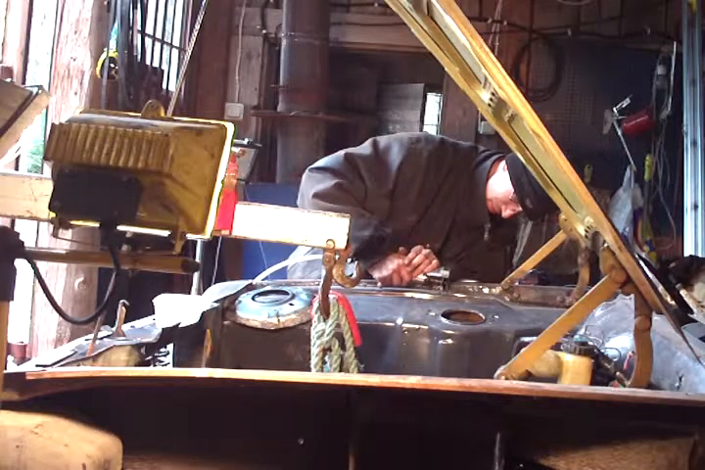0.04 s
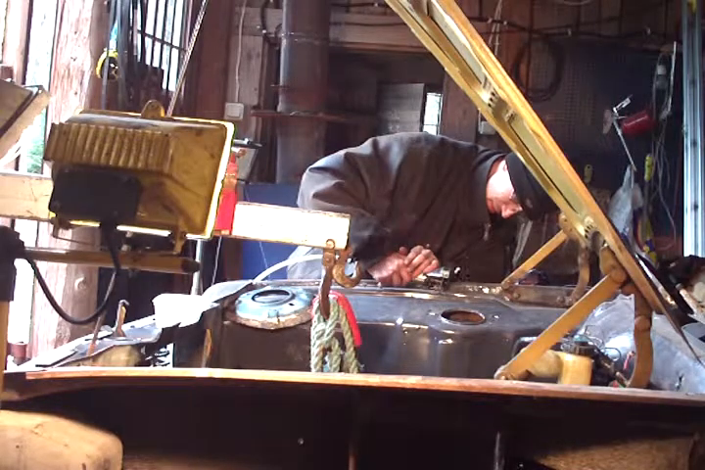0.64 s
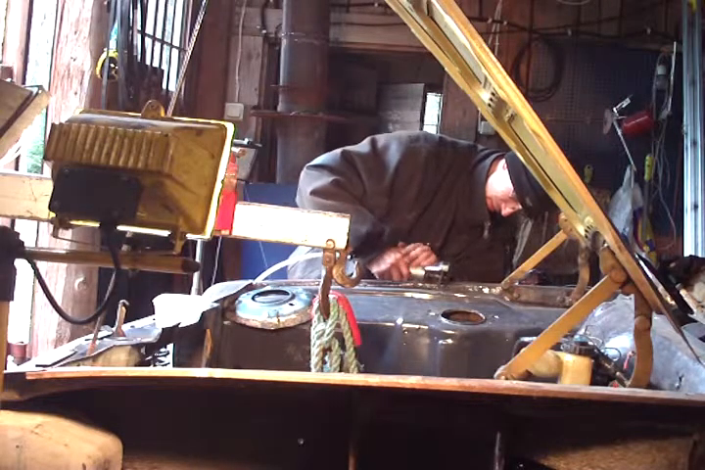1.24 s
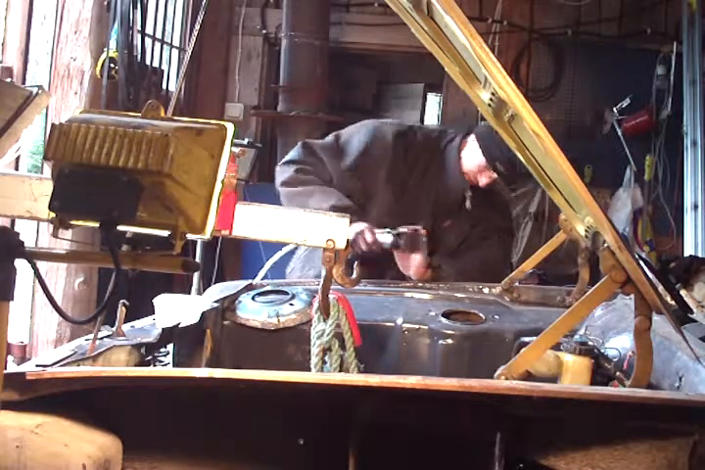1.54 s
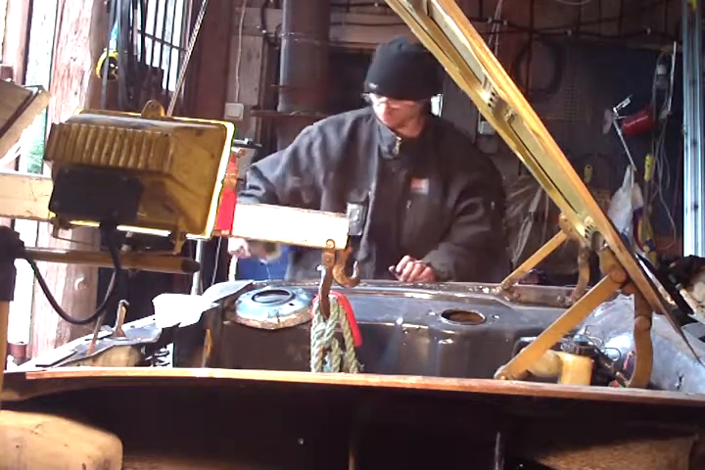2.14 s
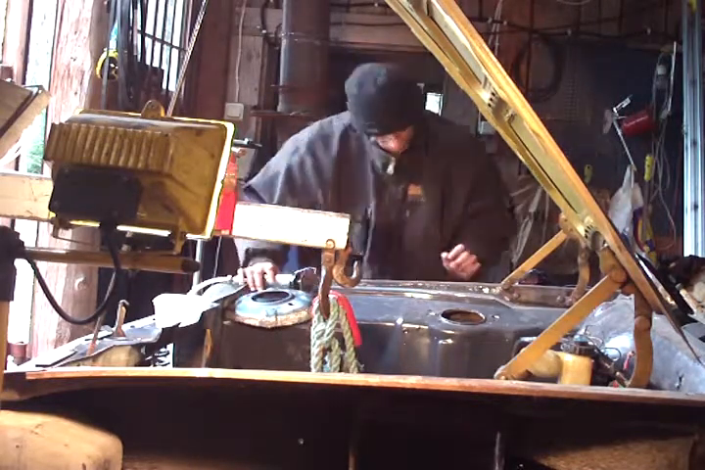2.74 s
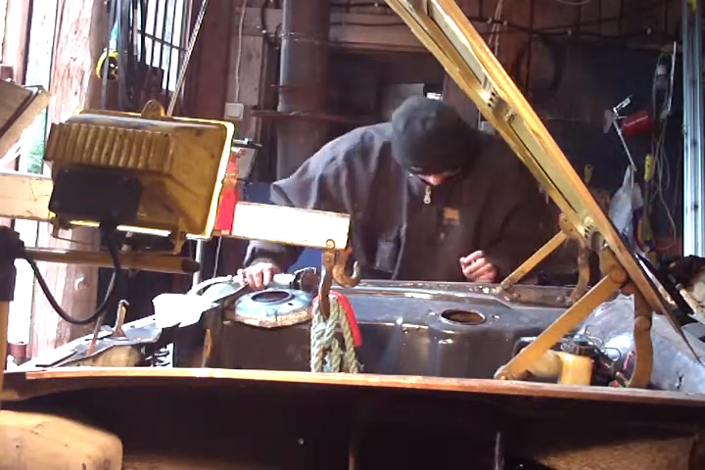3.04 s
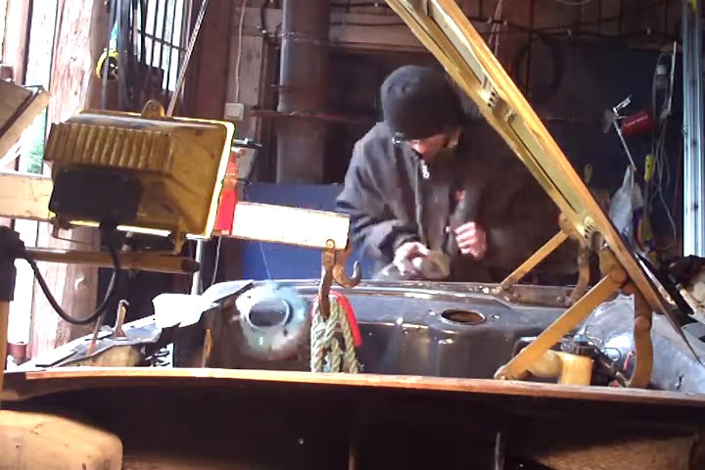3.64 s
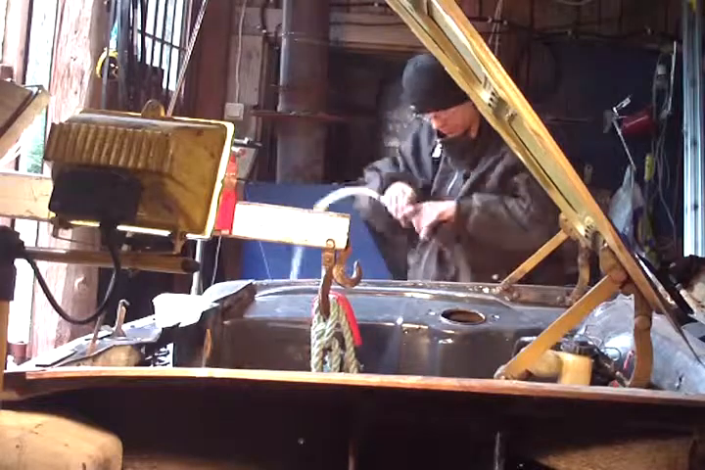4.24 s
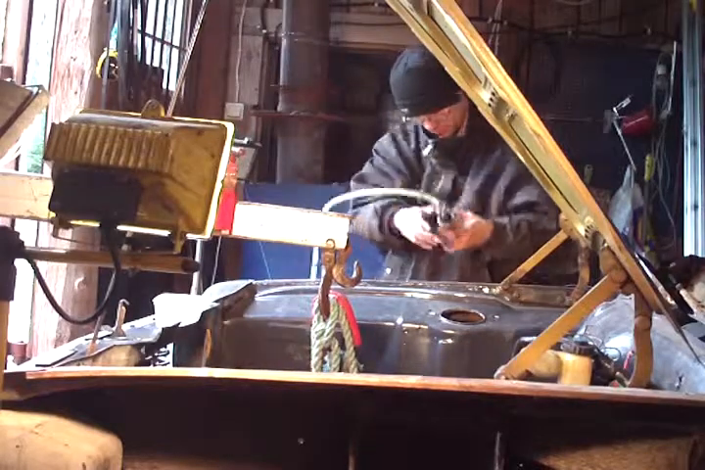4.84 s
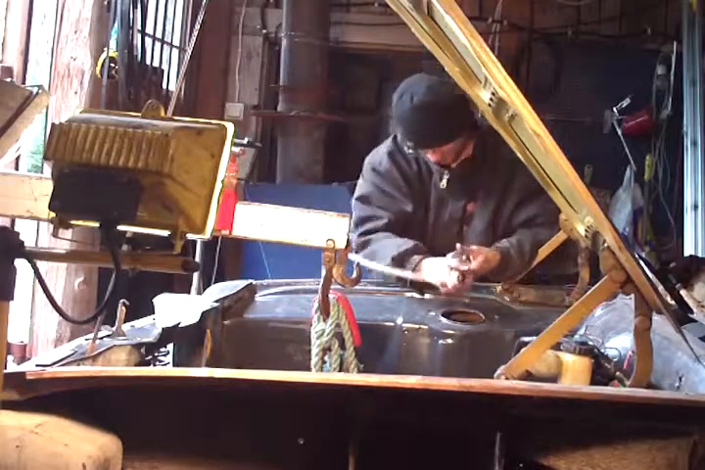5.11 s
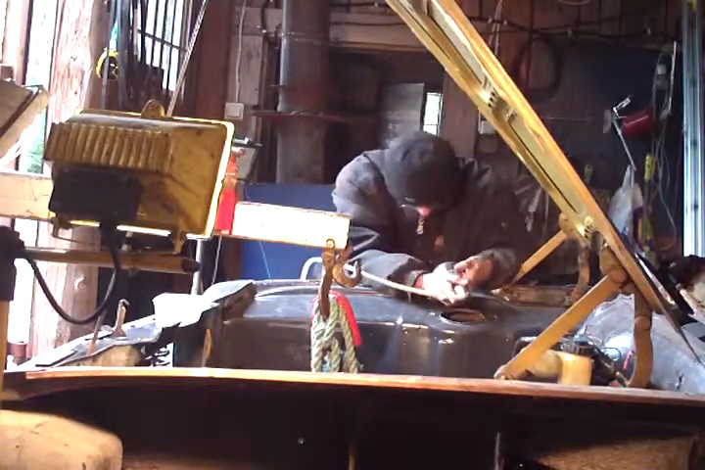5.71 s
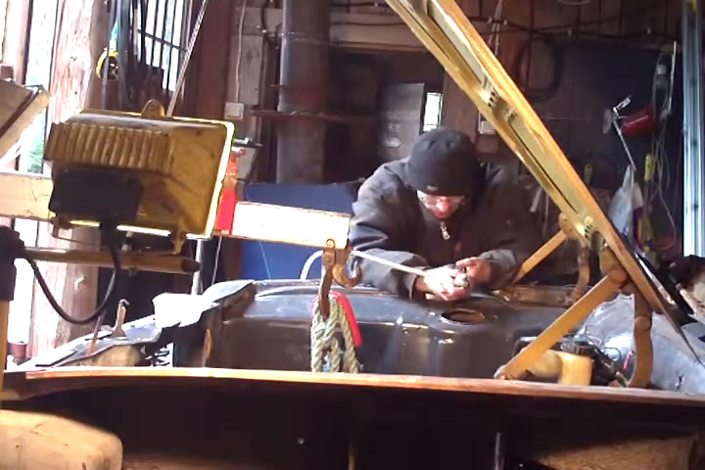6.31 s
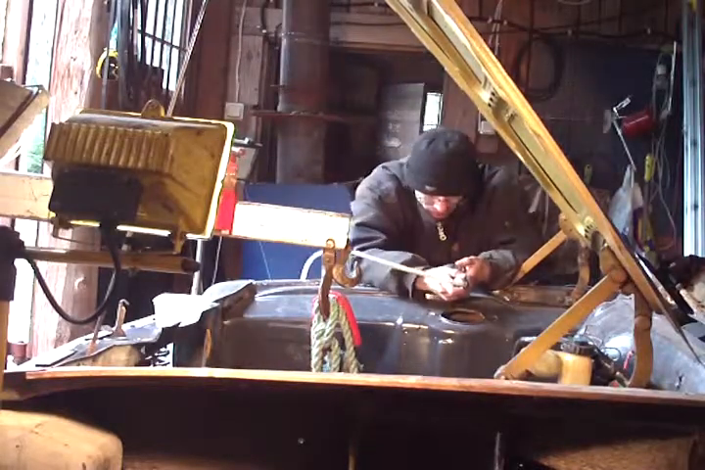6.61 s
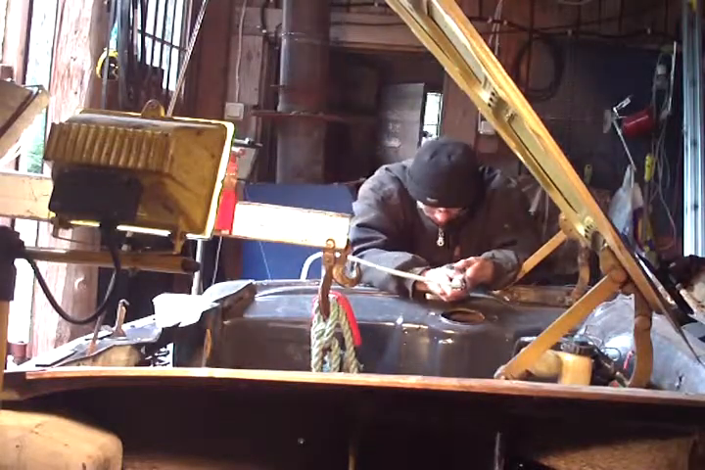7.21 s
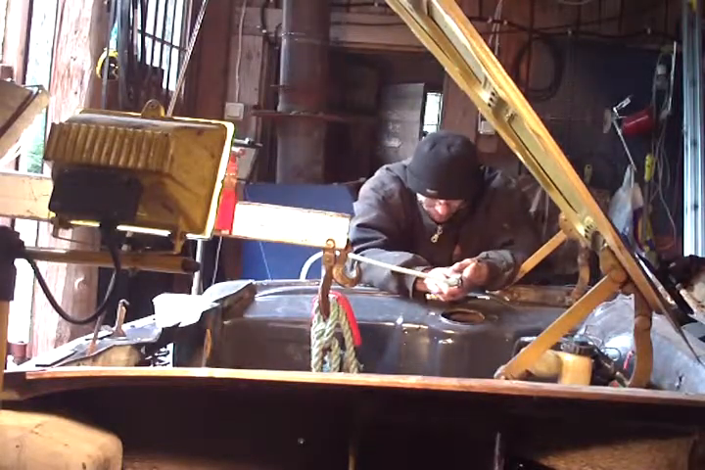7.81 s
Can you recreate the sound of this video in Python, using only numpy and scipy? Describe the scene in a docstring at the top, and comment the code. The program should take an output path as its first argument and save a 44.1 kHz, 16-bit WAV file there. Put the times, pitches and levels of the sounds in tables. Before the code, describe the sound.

An air grinder is already cutting a sheet-steel tank, with a whining tone, a rasp and hissing air. Its pitch sags and it chatters around 0.5 seconds and again near 1.1, then it whoops up briefly at 1.3 and winds down, leaving a low room rumble. From 2.5 to 2.7 seconds it is set down with a few metal knocks, and dull thuds follow near 3.4. At about 3.8 a loose steel lid slides with a faint hiss and falls, clattering loudest at 4.2. Ringing clanks, booms and small high clinks continue until 5.5, with softer thuds up to 6.3. After a lull, the grinder spins up at 7.4 with a rising whine and hiss, touching the steel near 7.9 with a rasp and thin squeal. The hard workshop echoes, and the loudest blows slightly overload a dull microphone.

```python
"""Air grinder and a falling steel lid

An air grinder bites into a sheet-steel tank, bogs down, chatters and is let go. Its air-driven vanes
sing, its burr (the cutting tip) rasps and its exhaust hisses. It is set down; a loose steel lid
slides off the tank, falls and clatters, and more knocks follow. Then the grinder spins up again.
The hard workshop echoes, and the loudest blows overload a dull microphone."""
import sys
import numpy as np
from scipy import signal
from scipy.fft import rfft, irfft, next_fast_len
from scipy.io import wavfile
from scipy.ndimage import uniform_filter1d, map_coordinates

SR = 44100
rng = np.random.default_rng(int(sys.argv[2]) if len(sys.argv) > 2 else 0)


def output_pcm(signal):
    """Save a mono or channel-first signal as 16-bit PCM at the path in sys.argv[1].

    Samples are clipped to [-1, 1] before scaling.
    """
    pcm = np.clip(np.atleast_2d(signal).T, -1, 1) * 32767
    wavfile.write(sys.argv[1], SR, np.round(pcm).astype(np.int16))


N = 355446
TIME_S = np.arange(N) / SR
START_S = 7.357  # the air valve opens for the second run
TOUCH_S, PRESS_S = 7.85, 0.14  # the burr is eased back on to the steel
STALL_HZ, REST_HZ = 91.89, 25  # shaft speeds: chatter grows below the first, silence at the second


def amp(db):
    """Turn decibels into a gain."""
    return 10 ** (np.asarray(db) / 20)


def unit(x):
    """Scale x to an average power of 1."""
    return x / np.sqrt(np.mean(x ** 2) + 1e-20)


def along(points, hz):
    """Read between (pitch_hz, value) points on a log pitch axis."""
    pitches, values = np.transpose(points)
    return np.interp(np.log(hz + 1), np.log(pitches + 1), values)


def ramp(start_s, length_s):
    """Rise from 0 to 1, then stay there."""
    return np.clip((TIME_S - start_s) / length_s, 0, 1)


def bump(peak_s, width_s):
    """Rise smoothly to 1 and fall back."""
    return np.exp(-((TIME_S - peak_s) / width_s) ** 2)


def wobble(rate):
    """A smooth curve through `rate` random values a second."""
    return map_coordinates(rng.standard_normal(int(N * rate / SR) + 4), [TIME_S * rate])


def filtered(x, response):
    """Multiply each frequency of x by response(hz)."""
    size = next_fast_len(len(x) + 8192)
    return irfft(rfft(x, size) * response(np.fft.rfftfreq(size, 1 / SR)), size)[:len(x)]


def coloured(x, spectrum):
    """Shape x with (pitch_hz, level_db) points, at a power of 1."""
    return unit(filtered(x, lambda hz: amp(along(spectrum, hz))))


def band(x, low_hz, high_hz, order=3):
    """Keep what lies between two frequencies."""
    return signal.sosfilt(signal.butter(order, [low_hz, high_hz], "band", fs=SR, output="sos"), x)


def workshop():
    """Still room air over an uneven low rumble."""
    # the room's air: pitch_hz, level_db
    air_spectrum = [(12, -31), (20, -5.5), (65, -3.5), (81, -16), (98, -25.5), (215, -15.5), (249, -9.5),
                    (333, -17.5), (887, -15.5), (1450, -26), (4920, -36), (6930, -55), (9010, -73),
                    (15200, -120)]
    air = amp(-41) * coloured(rng.standard_normal(N), air_spectrum)
    rumble = unit(band(rng.standard_normal(N), 5.1, 73, order=2))
    return air + amp(-42 + 1.9 * wobble(9.8)) * rumble


def room_fade(x):
    """Each frequency of x dies away at the room's own speed."""
    # time the echo takes to fall 60 dB: pitch_hz, fade_s
    fade_times = [(100, 0.65), (260, 0.81), (700, 0.61), (1840, 0.76), (4850, 0.61)]
    hz, t, spectrum = signal.stft(x, SR, nperseg=256)
    fade = amp(-60 * t / along(fade_times, hz)[:, None])
    return signal.istft(spectrum * fade, SR, nperseg=256)[1][:len(x)]


def in_room(x, echo_db):
    """Add the echo of the hard walls, at about the same overall power."""
    tail = room_fade(rng.standard_normal(SR))
    tail *= amp(echo_db) / np.linalg.norm(tail)
    return (x + signal.fftconvolve(x, tail)[:N]) / np.hypot(1, amp(echo_db))


def lid_slide(start_s=3.82, length_s=0.085):
    """The lid's rim hisses over the tank's edge, louder and louder, until it drops."""
    sliding = ramp(start_s, length_s) * (1 - ramp(start_s + length_s, 0.014))
    hiss = unit(band(rng.standard_normal(N), 3600, 5600, order=2))
    return in_room(amp(-46) * sliding * hiss, echo_db=3)


def clinks():
    """A small hard steel part rings high and clear as it is jolted."""
    # the jolts: start_s, level_db
    jolts = [(2.722, -45.5), (3.695, -47), (4.192, -35), (4.406, -26), (4.481, -36.5), (4.798, -39),
             (5.007, -43), (5.238, -30.5), (5.5, -43)]
    # the part's ringing tones: pitch_hz, level_db, fade_s (to fall 60 dB)
    part_tones = [(2825, -2, 0.32), (2900, -5.5, 0.34), (3890, -5.5, 0.19), (4005, -8, 0.27),
                  (4190, -7, 0.19), (4580, -10, .4), (5040, -10, 0.28), (5640, -14.5, 0.25),
                  (5720, -14.5, 0.18), (6500, -22, 0.32), (6970, -27.5, 0.16)]
    hz, db, fade_s = np.transpose(part_tones)[:, :, None]
    out, t = np.zeros(N + SR), np.arange(SR) / SR
    attack = 1 - np.exp(-t / 0.0014)
    for start_s, level_db in jolts:
        fade = amp(db + rng.normal(0, 2.2, hz.shape) - 60 * t / fade_s)
        ring = fade * np.sin(2 * np.pi * (hz * t + rng.random(hz.shape)))
        out[round(start_s * SR):][:SR] += amp(level_db) * ring.sum(axis=0) * attack
    return in_room(out[:N], echo_db=-3)


def peaky_noise(spacing_hz, depth_db):
    """Noise with random narrow treble peaks, giving the clatter a glassy, ringing colour."""
    heights = rng.standard_normal(2000)

    def response(hz):
        peaks = 2 * np.tanh(map_coordinates(heights, [hz / spacing_hz], mode="mirror") / 2)
        return amp(np.clip(hz / 2500, 0, 1) * depth_db * peaks)
    return filtered(rng.standard_normal(SR), response)


def steel_ring(favoured_hz):
    """Struck steel rings at many pitches; the spot that is hit favours those near one."""
    # the steel's ringing tones: pitch_hz, level_db, fade_s (to fall 60 dB, at the longest)
    steel_tones = [(245, -5, .5), (339, -1, .7), (385, -4, .5), (431, -5, .7), (587, -7, .35),
                   (716, -5, .5), (910, -7, .6), (985, -6, .5), (1304, -12, .6), (1370, -9, .6),
                   (1540, -10, .8), (1674, -10.5, .9), (1774, -14, .8), (1965, -16, .8), (2023, -16, .8),
                   (2110, -18, .8), (2315, -18, .6), (2620, -17, .5), (2821, -14, .6), (2930, -15, .6),
                   (3090, -16, .6), (3640, -14, .6), (3876, -13, .55), (3989, -18, .5), (4221, -16, .5),
                   (4511, -16, .5), (5060, -24, .45), (5636, -26, .45)]
    hz, db, fade_s = np.transpose(steel_tones)[:, :, None]
    fade_s = fade_s * rng.uniform(0.62, 1, hz.shape)  # a hand or the floor damps each blow differently
    db = db + 9 * np.exp(-(np.log(hz / favoured_hz) / 0.081) ** 2) + rng.normal(0, 2.3, hz.shape)
    t = np.arange(2 * SR // 3) / SR
    # each tone is a close pair, so it throbs
    offset_hz = rng.uniform(2.66, 13.26, hz.shape)
    throb = np.cos(2 * np.pi * (offset_hz * t + 0.17 * rng.standard_normal(hz.shape)))
    waves = np.sin(2 * np.pi * (hz * t + rng.random(hz.shape)))
    ring = np.sum(amp(db - 60 * t / fade_s) * throb * waves, axis=0)
    return np.pad(ring, (0, SR - len(t)))


def blow(hardness, favoured_hz, ring_db):
    """Steel struck once: a crack, a dense clatter held by the room, and a ring."""
    # the clatter of a blow: pitch_hz, level_db
    clatter_spectrum = [(30, 1), (70, -1.5), (135, 3), (240, 2.5), (330, -1.5), (550, 0.5), (1000, 4.5),
                        (1200, -8.5), (1550, -9), (1900, -19), (2400, -13), (3300, -17), (4500, -23.5),
                        (5600, -32.5), (7000, -51.5)]
    t = np.arange(SR) / SR
    clatter = room_fade(coloured(peaky_noise(spacing_hz=75, depth_db=8.5), clatter_spectrum))
    # the first contact is brighter than the clatter that follows
    snap = coloured(rng.standard_normal(SR), clatter_spectrum)
    snap += amp(-14.5) * unit(band(rng.standard_normal(SR), 2500, 4600))
    crack = hardness ** 2 * snap * amp(12 - 60 * t / 0.057)
    ring = amp(ring_db + 0.4 * hardness) * steel_ring(favoured_hz)
    attack_s = 0.00017 + 0.0071 * (1 - hardness) ** 3  # a glancing blow swells, a square one is sudden
    return (clatter + crack + ring) * (1 - np.exp(-t / attack_s))


def knocks(rebound_s=0.055, rebound_db=-10):
    """Heavy blows on the panel boom and thud, edge-on ones clank; each lands again, softer."""
    # blows on steel: start_s, level_db, boom_db, bass_db, treble_db, hardness (0-1), ring_db, favoured_hz
    blows = [(2.503, -21.5, -10.5, -2, -30, 0.57, -10, 944), (2.561, -42, -3, 11, -10, 0.5, -11, 3700),
             (2.675, -28, -5.5, 2.5, -19.5, 0.17, -13, 600),
             (2.724, -22, -9.5, -7, -23.5, 0.86, -2.5, 1350), (3.417, -31, 6, 12, -16.5, .3, -6.5, 246),
             (3.432, -29.5, 9, 8, -15.5, 0.67, -4.5, 387), (3.665, -31, -15.5, -3.5, -19.5, 0, -7, 960),
             (3.695, -22, -15.5, -6, -17.5, 0, -1, 2880), (3.903, -16.5, -10, 8.5, -14, 0.6, 1.5, 362),
             (4.19, -6.5, -14, -9.5, -14, 1, -7, 995), (4.232, -14.5, -16.5, -4, -20, 0.6, -0.5, 2020),
             (4.326, -20, -17, 1, -15, .1, -3.5, 2040), (4.406, -25.5, -4, 4.5, -5.5, 0.5, 5.5, 2800),
             (4.48, -15, -1.5, -2.5, -11, 0.9, -19, 563), (4.508, -17, -9, 1, -20, 0.72, -2, 1430),
             (4.585, -22.5, -4, 0.5, -12, 0.2, -9.5, 4220), (4.705, -24.5, -4, 0.5, -23, 0.2, -10, 417),
             (4.797, -16.5, -4, -3, -16.5, 0.6, -5.5, 1000), (4.86, -23, -5, 5.5, -18.5, 0.8, -4, 1710),
             (4.985, -36, 4.5, 7.5, -5, 0.2, 1.5, 3500), (5.198, -18, -8, -3, -17, 0.22, -12, 1436),
             (5.236, -11, -14, -8.5, -16.5, 0.8, -2.5, 1659), (5.361, -15, -11.5, -6, -19.5, 0.9, 0, 710),
             (5.412, -10.5, -12.5, -7, -20.5, 0.98, -6, 715),
             (5.501, -15.5, -12, -4.5, -19, 0.71, -5.5, 715), (5.626, -39, 0, 8.5, -23, .3, -4, 1560),
             (5.93, -37.5, 8.5, 8, -20, 0.47, -7.5, 410), (6.24, -32, -2, 0, -13, 0.23, -6.5, 1010),
             (6.31, -47.5, 2, 6, -17, 0.4, -2, 1370)]
    out = np.zeros(N + SR)
    for start_s, level_db, boom_db, bass_db, treble_db, hardness, ring_db, favoured_hz in blows:
        bands = (22, 110.4, boom_db), (127, 452, bass_db), (526, 2000, 0), (2010, 6700, treble_db)
        for delay_s, loss_db in ((0, 0), (rebound_s, rebound_db)):
            hit = blow(hardness, favoured_hz, ring_db)
            for low_hz, high_hz, band_db in bands:
                part = band(hit, low_hz, high_hz)
                part /= np.std(part[:SR // 25])  # the first 40 ms set the level
                out[round((start_s + delay_s) * SR):][:SR] += amp(level_db + loss_db + band_db) * part
    return out[:N]


def shaft_speed(free_hz=182.4, kick_hz=56.46, drag_hz_per_s=110):
    """Turns a second: the shaft cuts, coasts, spins up again and is dragged down by the steel."""
    # the shaft bogs down twice as the hand leans on it, then races when lifted: time_s, speed_hz
    first_cut = [(0, 113.9), (.13, 114), (.164, 114), (.2, 107), (.3, 101.6), (.4, 88.6), (.47, 77),
                 (.54, 72.7), (.65, 78), (.716, 79.6), (.774, 87.7), (.85, 89.3), (.95, 88), (1.05, 65.8),
                 (1.15, 68), (1.23, 77.6), (1.27, 91), (1.32, 120), (1.345, 113.5)]
    times_s, speeds_hz = np.transpose(first_cut)
    coasted_s = np.maximum(TIME_S - times_s[-1], 0)
    first_run = np.interp(TIME_S, times_s, speeds_hz) * np.exp(-coasted_s / 0.225)
    driven_s = np.maximum(TIME_S - START_S - 0.043, 0)  # the shaft sticks for a moment
    second_run = free_hz - (free_hz - kick_hz) * np.exp(-driven_s / 0.09)
    drag_hz = drag_hz_per_s * np.cumsum(ramp(TOUCH_S, PRESS_S)) / SR
    return np.maximum(np.where(TIME_S < START_S, first_run, second_run - drag_hz), REST_HZ)


def burr_chatter(speed_hz, jolt):
    """How much the burr skips (0 is a clean cut): more when slow, losing speed or jolted."""
    slowing = uniform_filter1d(np.maximum(-np.gradient(speed_hz), 0) * SR, SR // 20)
    skipping = 0.08 + 0.02275 * np.maximum(STALL_HZ - speed_hz, 0) + 0.002002 * slowing
    return np.clip(skipping + jolt, 0, 0.804)


def strikes(turns, scatter, spread_db):
    """One sharp pulse a turn, early or late by about `scatter` turns, equally strong at any speed."""
    whole_turns, samples = np.arange(1, int(turns[-1])), np.arange(N)
    timing, strength = rng.standard_normal((len(whole_turns), 2)).T
    at = np.interp(whole_turns + np.interp(whole_turns, turns, scatter) * timing, turns, samples)
    size = amp(spread_db * strength) / np.sqrt(np.interp(at, samples, np.gradient(turns)))
    # a pulse that falls between samples is shared among its neighbours
    nearby = at.astype(int)[:, None] + np.arange(-7, 9)
    offset = nearby - at[:, None]
    pulse = np.sinc(offset) * np.cos(np.pi * offset / 16) ** 2
    return np.bincount(np.clip(nearby, 0, N - 1).ravel(), (size[:, None] * pulse).ravel(), N)


def tank_wall(hz):
    """How strongly the wall under the burr answers at each frequency."""
    # the wall's resonances: pitch_hz, width_hz, level_db
    resonances = [(402, 130, -19), (528, 73, -5.5), (707, 87, 0), (1015, 55, 5), (1390, 80, 2),
                  (1700, 120, -5), (2333, 110, -16), (2570, 180, -11.5), (3056, 38, -12.5)]
    return sum((-1) ** k * amp(db) * 1j * hz * width / (pitch ** 2 - hz ** 2 + 1j * hz * width)
               for k, (pitch, width, db) in enumerate(resonances))


def shifting(x, depth_db):
    """Bright and dull patches come and go in x as the burr meets new steel."""
    spectrum = signal.stft(x, nperseg=512)[2]
    patches = uniform_filter1d(rng.standard_normal(spectrum.shape), size=6, axis=0)
    patches = unit(uniform_filter1d(patches, size=14, axis=1))
    return unit(signal.istft(spectrum * amp(depth_db * patches), nperseg=512)[1][:N])


def rasp_and_hiss(turns, cut, chatter, pressed):
    """The burr's bright once-a-turn rasp on steel, mixed with air hiss that pulses with the vanes."""
    # the tone colour of the rasp and the hiss: pitch_hz, level_db
    spectrum = [(100, -6), (250, 2), (1200, -7.5), (2000, -1.5), (2550, 0.5), (3000, -3), (3450, -6),
                (3900, -3), (4350, -3), (4490, 0), (4630, -3), (5100, -2), (5600, -10), (6300, -16),
                (7000, -31.5)]
    hiss = unit(rng.standard_normal(N) * (1 + 0.5 * np.cos(8 * np.pi * turns)))
    hiss = shifting(hiss, depth_db=2.5)
    hiss_share = np.clip(0.02 + 1.8 * chatter + 0.2 * (1 - pressed), 0, 1)
    return coloured(np.sqrt(1 - hiss_share) * cut + np.sqrt(hiss_share) * hiss, spectrum)


def shaft_tones(multiples, speed_hz, turns, housing=True):
    """Tones locked to the shaft; the housing lifts each one that glides through a resonance."""
    # resonances of the housing and exhaust port: pitch_hz, half_width_hz, lift_db
    resonances = [(251, 38, 9), (359.4, 16, 7.5), (471.5, 12, 7), (675, 27, 7), (812, 45, 6),
                  (998, 83, 7.5), (1390, 43, 6), (4310, 110, 16)]
    grid_hz = np.arange(SR // 4)
    lift_db = housing * sum(db * np.exp(-((grid_hz - hz) / width) ** 2) for hz, width, db in resonances)
    out = np.zeros(N)
    for multiple, db in multiples:
        waver_db = 2.5 * wobble(18)  # the tool moves in the hand
        gain = amp(db + waver_db + np.interp(multiple * speed_hz, grid_hz, lift_db))
        out += gain * np.sin(2 * np.pi * (multiple * turns + rng.random()))
    return out


def vanes(speed_hz, turns, chatter, pressed, gliding):
    """Four vanes chop the air into a tone; its overtones stand out at low speed and in quick glides."""
    # the vanes' tone and its neighbours: shaft_multiple, level_db
    low_tones = [(1, -18.5), (2, -15), (3, -11), (4, 2), (5, -12)]
    # the vanes' overtones: shaft_multiple, level_db
    overtones = [(6, -6.5), (7, -10.5), (8, 3), (9, -7), (11, -5.5), (12, -3.5), (14, -9.5), (16, -5.5),
                 (20, -12.5), (24, -12)]
    racing_hz = speed_hz - STALL_HZ
    low_gain = amp(-26.5 - 1.2 * pressed - 1.6 * chatter + 0.0471 * racing_hz)
    high_gain = amp(-29.5 + 0.56 * chatter - 0.0888 * racing_hz + 3 * gliding)
    flutter = unit(1 + 0.35 * wobble(160))  # swirling air roughens the overtones
    return (low_gain * shaft_tones(low_tones, speed_hz, turns)
            + high_gain * flutter * shaft_tones(overtones, speed_hz, turns))


def clean_bite(vane_sound, speed_hz, turns, slip_s=0.13):
    """Until the burr slips, its bite holds the vanes' tones down and makes the steel whine."""
    # the steel's whine: shaft_multiple, level_db
    whine_tones = [(6, 4), (9, -0.5), (12, 0), (22, -2.5), (23, -6), (25, -12), (26, -8.5), (34, -5),
                   (35, -6), (39, -7.5), (40, -11), (41, -7.5), (44, -10)]
    biting = 1 - ramp(slip_s, 0.04)
    whine = amp(-26.5) * biting * shaft_tones(whine_tones, speed_hz, turns, housing=False)
    return amp(-5.5 * biting) * vane_sound + whine


def grinder(lift_s=1.213, shut_s=1.273):
    """One shaft drives the vanes' tones, the burr's strikes and the pulsing air hiss."""
    speed_hz = shaft_speed()
    opened = ramp(START_S, 0.031)
    valve = 1 - ramp(shut_s, 0.055) + opened
    leak = amp(-1.5) * (ramp(START_S - 0.08, 0.08) - opened)  # air seeps out just before it opens
    # with no air to load it the shaft sings louder, then fades as it runs down
    coasting = amp(1.5) * (1 - valve) * (speed_hz > REST_HZ) * np.minimum(speed_hz / 83, 1) ** 3
    starting = opened - ramp(START_S + 0.095, 0.19)
    freed = bump(1.37, 0.09)  # off the steel, the shaft whoops and the rasp drops away
    graze = bump(7.895, 0.03)  # the burr grazes the steel again
    touch = ramp(TOUCH_S, PRESS_S)
    pressed = 1 - ramp(lift_s, 0.055) + touch / 2
    chatter = (1 - 0.6 * freed) * burr_chatter(speed_hz, jolt=0.35 * starting + 0.37 * graze)
    jerk = (0.004 + 0.028 * chatter ** 2) * wobble(70)  # a skipping burr jerks the shaft
    turns = np.cumsum(speed_hz * (1 + jerk)) / SR

    tone = vanes(speed_hz, turns, chatter, pressed, gliding=freed + starting)
    tone = clean_bite(tone, speed_hz, turns)
    # a clean cut repeats each turn; a skipping burr lands unevenly, four times a turn
    cut = strikes(turns, 0.0086 * chatter, spread_db=0.1)
    skips = unit(strikes(4 * turns, 0.16 + 0.13 * chatter, spread_db=5.5))
    rasp = unit(filtered(np.sqrt(1 - chatter ** 2) * cut + chatter * skips, tank_wall))
    rasp *= amp(-34.5 + 14.06 * pressed + 1.8 * chatter + 15.5 * graze - 7 * freed)
    rasp *= valve + amp(-1.5) * coasting
    bright = (valve + leak) * amp(-31 + 8 * pressed) * rasp_and_hiss(turns, cut, chatter, pressed)
    squeal = amp(-24.5) * touch ** 2 * unit(band(cut + 0.98 * skips, 4450, 5420, order=2))
    pressure = amp(0.92 * chatter * wobble(25))  # the hand is unsteady while the burr chatters
    tone *= (valve + coasting) * amp(3 * starting + 1.5 * freed + 2.8 * chatter * wobble(35))
    return in_room(tone, echo_db=-6) + in_room(pressure * (rasp + bright) + squeal, echo_db=2)


def scene():
    """Grinder, lid, knocks, clinks and room, in mono."""
    return (grinder() + lid_slide() + knocks() + clinks() + workshop())[None]


def record(dry):
    """A dull microphone rounds off the loudest peaks; what still overshoots is clipped."""
    overload, treble_limit_hz, top_hz = 1.1, 7084, 15300
    rounded = dry[0] / (1 + np.abs(dry[0] / overload) ** 6) ** (1 / 6)
    dulled = signal.sosfilt(signal.ellip(10, 0.2, 80, treble_limit_hz, fs=SR, output="sos"), rounded)
    return filtered(np.clip(dulled, -1, 1), lambda hz: hz < top_hz)[None]


dry = scene()
out = record(dry)
output_pcm(out)
```